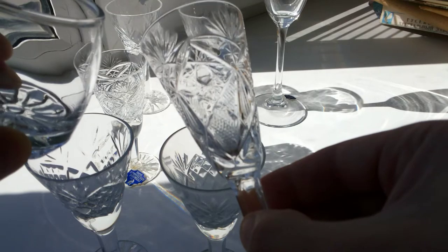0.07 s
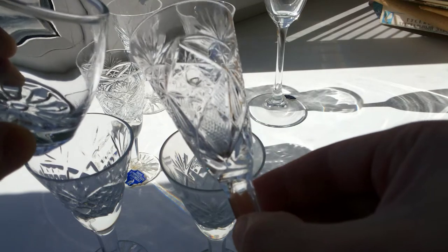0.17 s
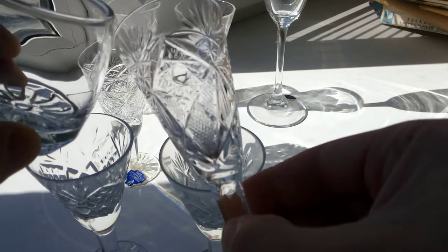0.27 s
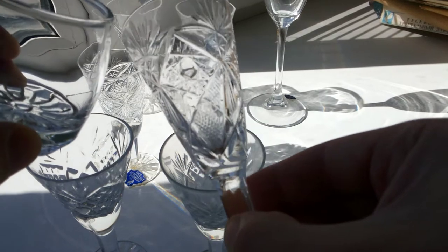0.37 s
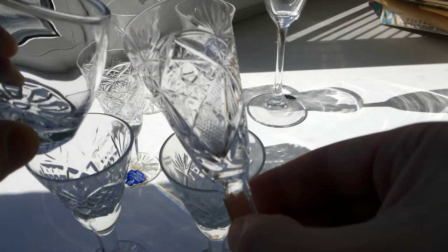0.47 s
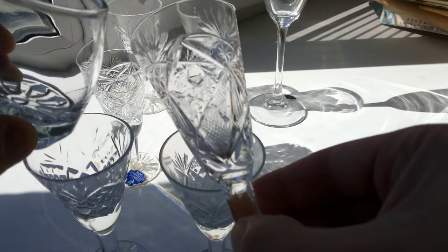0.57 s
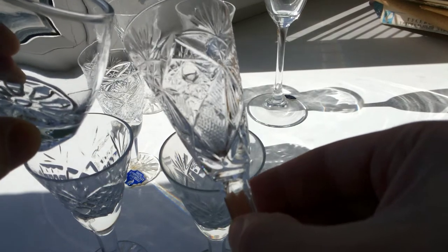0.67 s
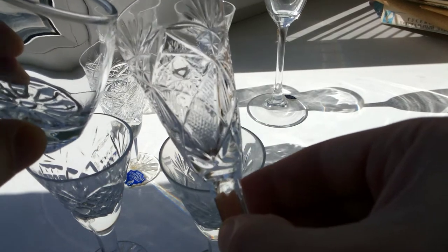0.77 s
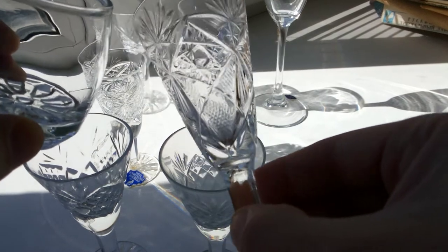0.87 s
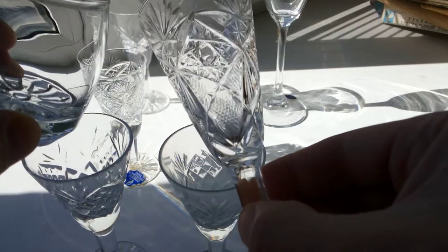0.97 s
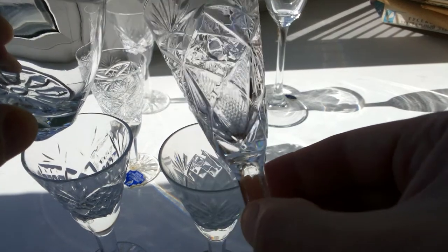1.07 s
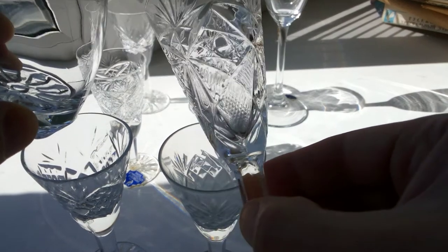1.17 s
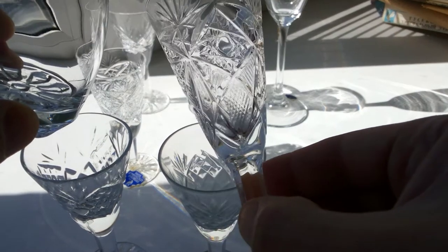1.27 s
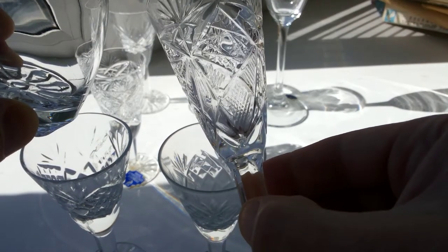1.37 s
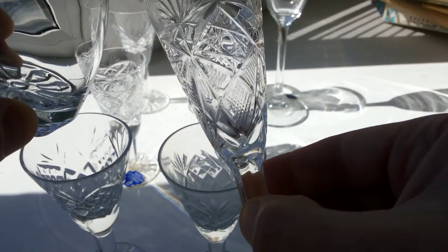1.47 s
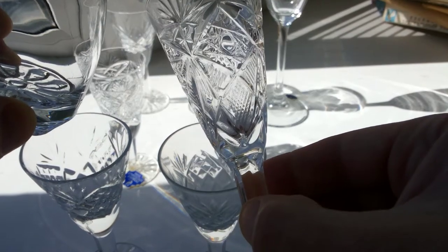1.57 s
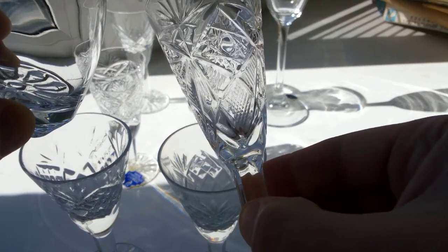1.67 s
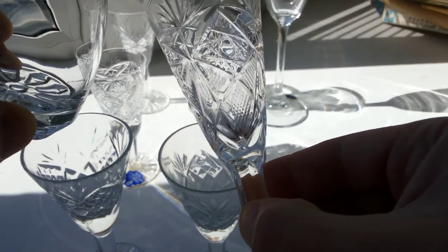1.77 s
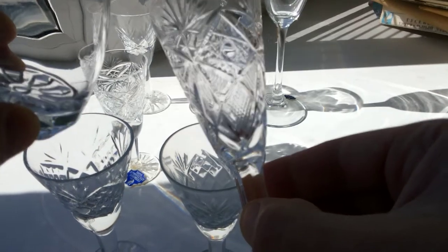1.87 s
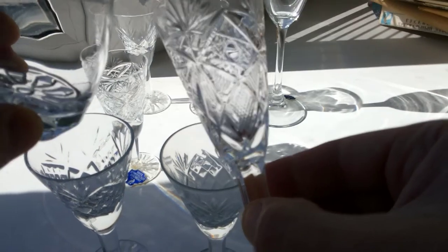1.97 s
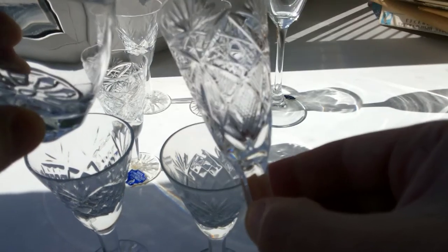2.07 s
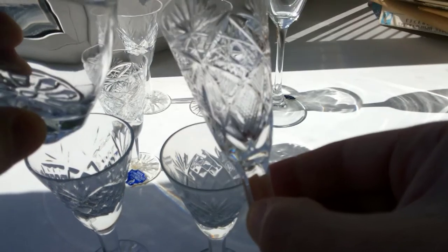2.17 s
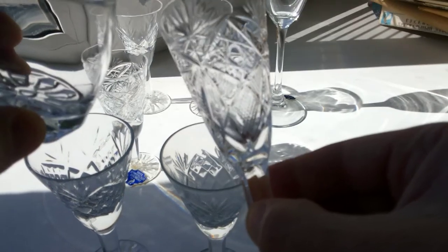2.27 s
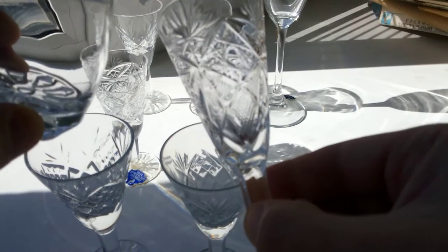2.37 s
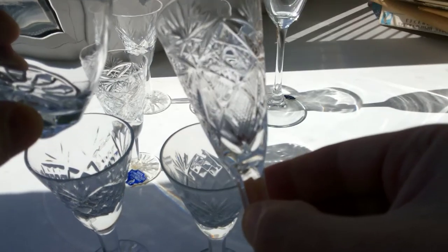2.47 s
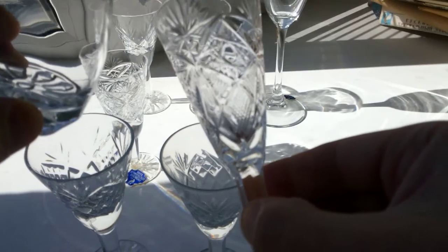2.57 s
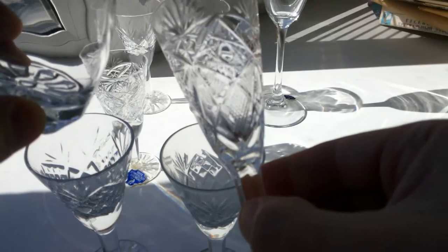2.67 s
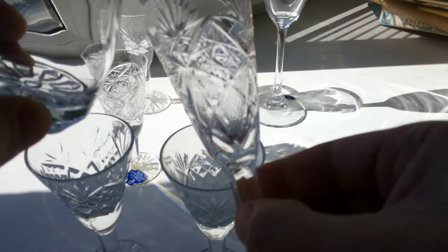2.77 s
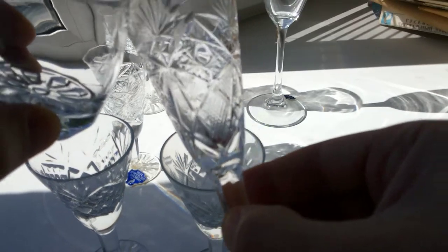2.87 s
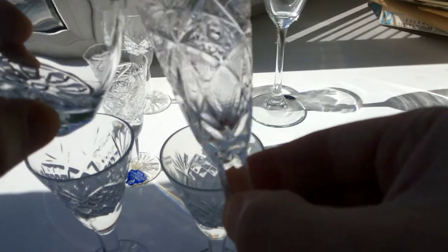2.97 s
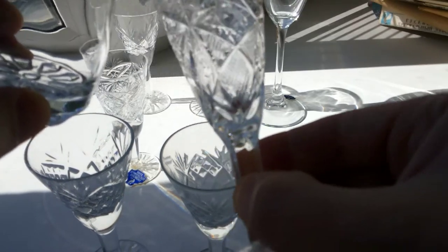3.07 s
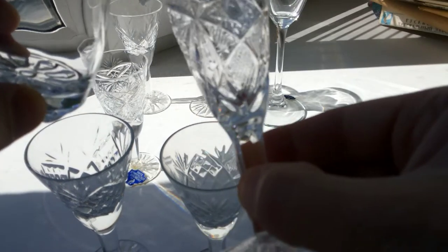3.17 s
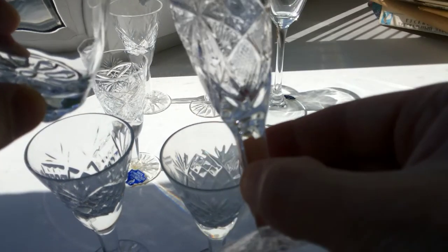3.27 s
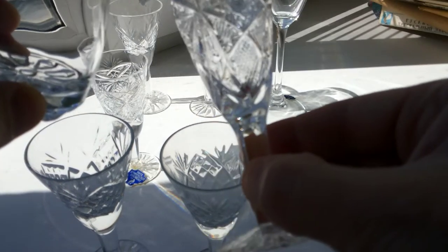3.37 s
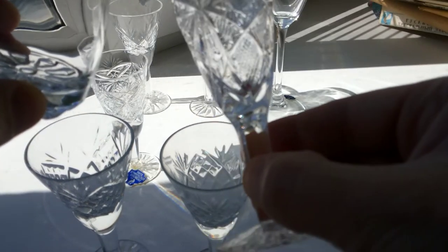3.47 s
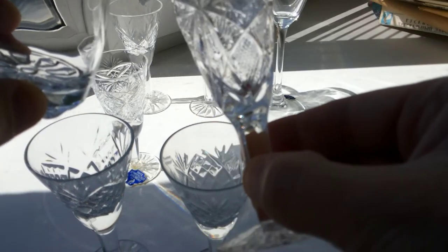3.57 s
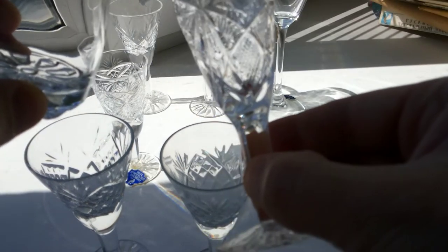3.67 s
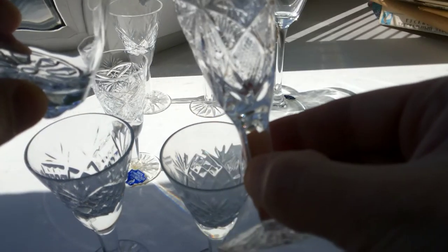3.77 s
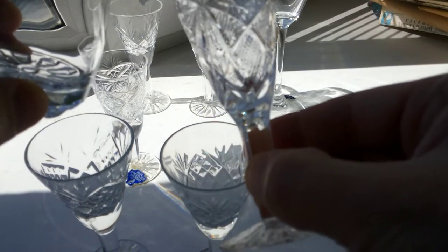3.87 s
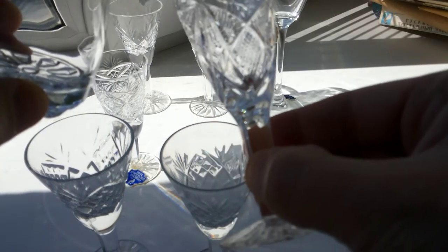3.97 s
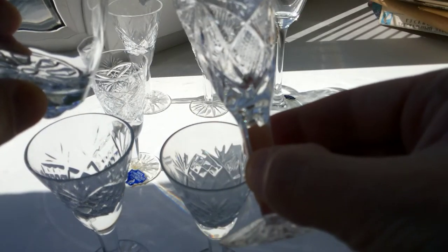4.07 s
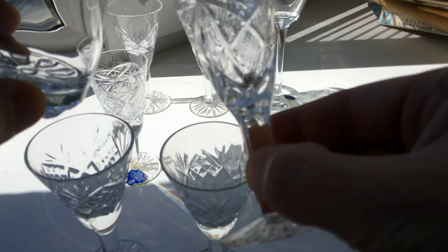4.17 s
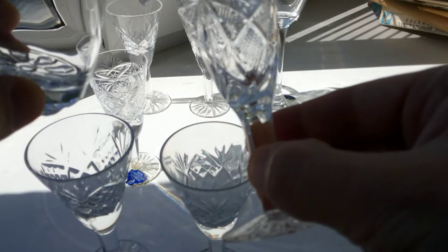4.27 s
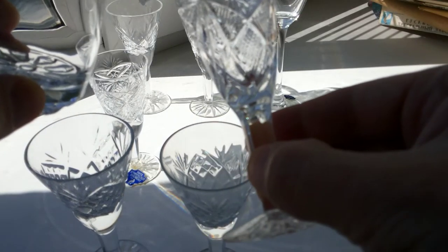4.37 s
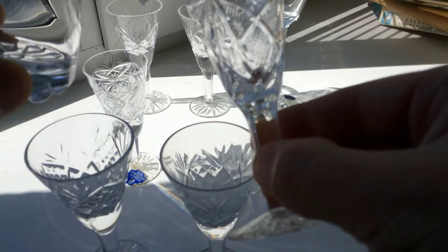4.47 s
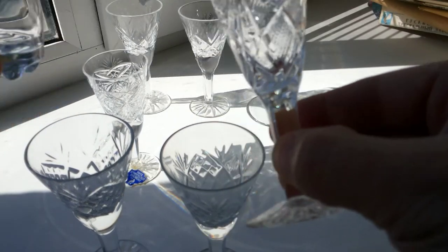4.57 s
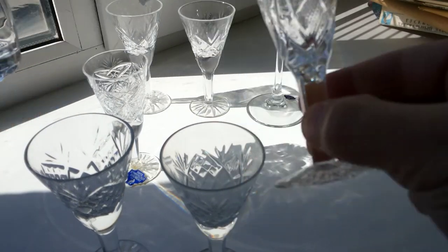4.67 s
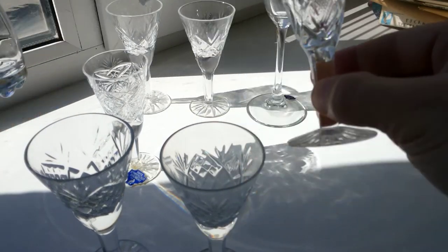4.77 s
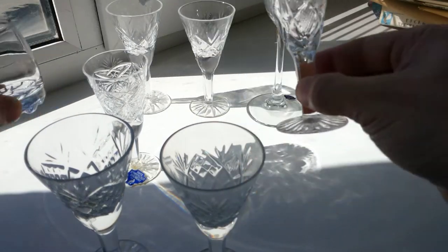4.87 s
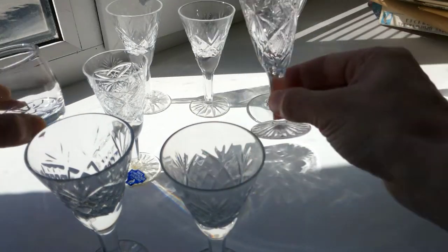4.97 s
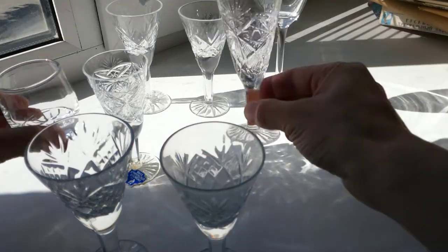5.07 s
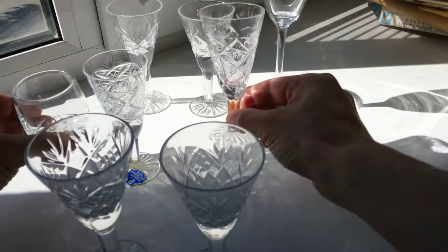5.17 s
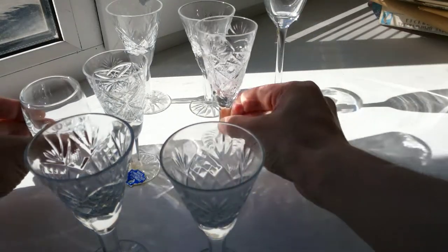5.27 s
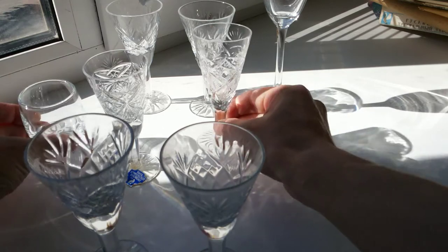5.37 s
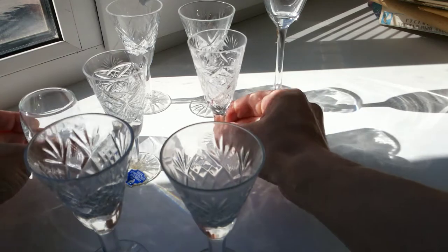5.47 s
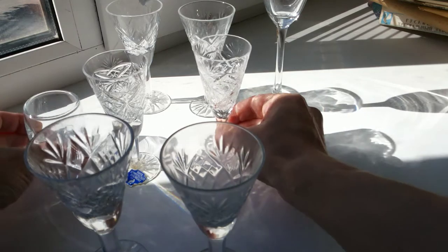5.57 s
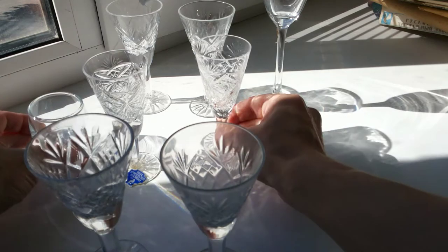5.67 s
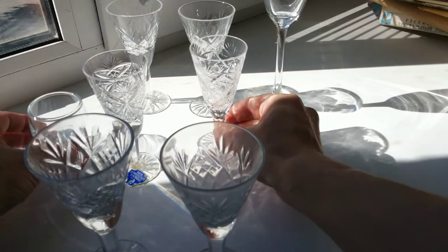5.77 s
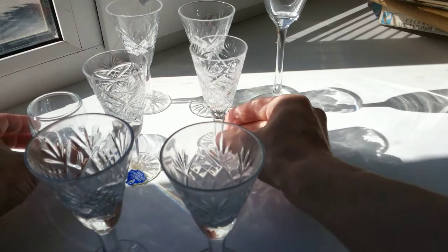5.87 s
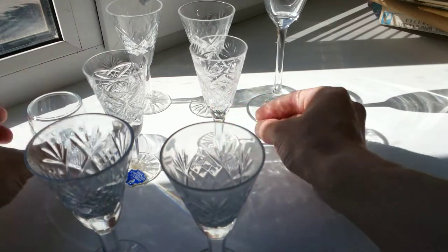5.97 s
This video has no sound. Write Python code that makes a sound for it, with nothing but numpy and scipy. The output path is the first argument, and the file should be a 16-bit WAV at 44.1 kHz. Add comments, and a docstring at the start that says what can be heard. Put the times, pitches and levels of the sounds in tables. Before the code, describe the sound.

A small quiet room heard close up: soft, low-weighted room air, a faint wavering drone and an almost inaudible high whine. At about 0.84 seconds two cut-crystal rims meet and bounce three times within 0.06 seconds, the last touch weaker: a hard, short clack, a bright glittering flare, then thin high tones, the main one near 3 kHz, slowly beating and fading over about a second. Quiet returns. At 2.99 a stronger, brighter clink arrives as two touches 0.03 seconds apart, with a similar shimmering, beating ring dying by about 4.4. Around 5.2 to 5.5 reaching arms make a soft rustle and low rumble. At 5.73 light knocks begin, the heaviest cluster at 5.78, then smaller rocking knocks at about 5.9 and 6.0: dull, low-mid, woody thuds with faint glassy ticks and a little hiss, in short room reflections.

```python
"""Two crystal glasses clink together twice, close by, in a small quiet room, then are set down on a table.
In each clink the rims bounce on each other: a hard clack, a bright flare, then beating, fading tones.
The tones are sine waves, many in close pairs; the clack is a few short resonances, the flare shaped noise.
The table answers the feet of the glasses with dull knocks: struck resonances over a thud of noise.
Reaching arms rustle and rumble softly before it; room air, a low drone and a faint whine lie beneath."""
import sys
import numpy as np
from scipy import signal
from scipy.fft import rfft, irfft, next_fast_len
from scipy.io import wavfile

SR = 44100
rng = np.random.default_rng(int(sys.argv[2]) if len(sys.argv) > 2 else 0)


def wav_out(sig):
    """Save sig, one row per channel (or a flat mono array), as 16-bit PCM at SR to the path in sys.argv[1]."""
    wavfile.write(sys.argv[1], SR, np.round(np.clip(np.atleast_2d(sig).T, -1, 1) * 32767).astype(np.int16))


N = 265967
TIME = np.arange(N) / SR  # seconds

# touches of the two rims, one list per clink:
# (t/s, new ringing level/dB, earlier ringing that survives level/dB, clack level/dB, shimmer level/dB)
CLINKS = [
    [(0.8403, -2.5, 0, -1, -1.5), (0.8714, -3.5, -21, -2.5, -5), (0.9021, -7.5, -4.5, -12.5, -14)],
    [(2.9928, 0, -3, 2, 2), (3.0270, -0.5, -9, -2, 2.5)],
]


def from_db(db):
    """Turn decibels into gain."""
    return 10 ** (np.asarray(db) / 20)


def noise(spectrum):
    """Make noise of rms 1 whose colour follows points of frequency and relative level."""
    hz, db = np.transpose(spectrum)
    size = next_fast_len(N)
    grid = np.maximum(np.fft.rfftfreq(size, 1 / SR), 1)
    gain = from_db(np.interp(np.log(grid), np.log(hz), db))
    white = rng.standard_normal(size)
    x = irfft(rfft(white) * gain, size)[:N]
    return x / np.std(x)


def decay(start, t60):
    """An envelope that jumps to 1 and dies away, losing 60 dB in t60 seconds."""
    age = TIME - start
    return (age >= 0) * np.exp(-np.log(1000) * np.clip(age / t60, 0, 10))


def swell(peak_s, rise_db_per_s, fall_db_per_s):
    """An envelope that grows to 1 and fades again."""
    age = TIME - peak_s
    return from_db(np.minimum(rise_db_per_s * age, -fall_db_per_s * age))


def click(start, db):
    """A single impulse, like one very short tap."""
    return from_db(db) * (np.arange(N) == round(start * SR))


def ring(force, hz, t60):
    """A resonance: each unit impulse in the force starts a fading sine of about height 1."""
    r = np.exp(-np.log(1000) / (t60 * SR))
    w = 2 * np.pi * hz / SR
    # the tiny offset here and in the filters below keeps the numbers from getting too small to compute fast
    return signal.lfilter([0, np.sin(w)], [1, -2 * r * np.cos(w), r * r], force + 1e-18)


def low_pass(x, hz, order=2):
    """Round off the treble."""
    sections = signal.butter(order, min(hz, .45 * SR), fs=SR, output="sos")
    return signal.sosfilt(sections, x + 1e-18)


def high_pass(x, hz, order=2):
    """Take away the bass."""
    sections = signal.butter(order, hz, "high", fs=SR, output="sos")
    return signal.sosfilt(sections, x + 1e-18)


def drone(hz=167, t60=0.084):
    """Noise of rms 1 held in a narrow low resonance, which makes it waver."""
    x = ring(ring(rng.standard_normal(N), hz, t60), hz, t60)
    return x / np.std(x)


def background(air_db=-56.5, drone_db=-65.5, whine_t60=0.05):
    """Steady room air is coloured noise; the low drone and faint whine are noise in narrow resonances."""
    # colour of the room air: (f/Hz, relative level/dB)
    air_colour = [(15, -55), (25, -23), (91, -4.5), (137, -7.5), (165, 0.5), (205, -9.5), (361, -15),
                  (403, -14.5), (637, -18.5), (2150, -26), (3390, -25), (4450, -27.5), (6490, -24.5),
                  (7030, -29), (15800, -28)]
    # faint steady whine: (f/Hz, level/dB)
    whine_tones = [(6940, -90), (5650, -97)]
    out = from_db(air_db) * noise(air_colour) + from_db(drone_db) * drone()
    for hz, db in whine_tones:
        whine = ring(rng.standard_normal(N), hz, whine_t60)
        out += from_db(db) * whine / np.std(whine)
    return out


def arms(rustle_db=-61, rumble_db=-54):
    """One reach toward the table: a soft rustle and a low rumble swell and fade together."""
    # colour of the rustle: (f/Hz, relative level/dB)
    rustle_colour = [(100, -20), (300, 3), (1100, -2.5), (2000, -13), (8000, -21)]
    effort = swell(peak_s=5.37, rise_db_per_s=110, fall_db_per_s=36)
    rustle = from_db(rustle_db) * noise(rustle_colour)
    rumble = from_db(rumble_db) * drone()
    return effort * (rustle + rumble)


def room(x, early_db, late_db, early_t60=0.13, late_t60=0.68, gap=0.0054):
    """Quick reflections from the table and window, then a faint tail, both made of fading noise."""
    # colour of the reflections: (f/Hz, relative level/dB)
    room_colour = [(80, 12), (500, 6), (1500, -1.5), (5000, 6.5), (15000, -3)]
    out = x
    for db, t60 in (early_db, early_t60), (late_db, late_t60):
        echo = (noise(room_colour) * decay(gap, t60))[:SR]
        echo = echo / np.linalg.norm(echo)
        out = out + from_db(db) * signal.fftconvolve(x, echo)[:N]
    return out


def table(body_db=-16, body_t60=0.023, tail_db=-32, tail_t60=0.3, hardness=1.66, swell_hz=700, scatter_db=2.0):
    """The feet land and rock: each contact strikes the table's resonances, with a faint tick of glass."""
    # feet meeting the table: (t/s, knock level/dB, contact brightness f/Hz, glassy tick level/dB, tick t60/s)
    set_downs = [(5.7279, -6, 1290, -37.5, 0.012), (5.7397, -7.5, 600, -66, .028),
                 (5.7519, -9, 1800, -64, .028), (5.7811, 2.5, 1200, -47.5, 0.037),
                 (5.7852, 1, 1290, -41, 0.044), (5.7905, -1.5, 1510, -37.5, 0.043),
                 (5.8089, -12, 1100, -65, .028), (5.8960, -10.5, 900, -56, .028),
                 (5.9100, -3.5, 660, -70, .028), (5.9170, -4, 620, -57, .028),
                 (5.9971, -15, 249, -72, .028)]
    # main resonances of the table top: (f/Hz, t60/s, level/dB before random scatter)
    table_modes = [(98, 0.203, -31.5), (173, 0.23, -29), (302.4, 0.12, -22), (410, 0.05, -25),
                   (436, 0.1, -26), (494, 0.072, -23), (564, 0.054, -16), (687, 0.012, -18),
                   (790, 0.046, -23.5), (840, 0.047, -18), (988, 0.042, -31), (1126, 0.093, -25.5),
                   (1366, 0.15, -36)]
    # dense body of the table under its main resonances: (f/Hz, relative level/dB)
    table_body = [(40, -29), (100, -19), (200, 0), (330, 0), (560, 4), (850, -2.5), (1400, -7.5),
                  (1900, -18), (2600, -35), (5000, -27)]
    # colour of the glassy ticks: (f/Hz, relative level/dB)
    tick_colour = [(2000, 1), (5000, -2.5), (8000, -9), (11500, 2.5), (15500, -2)]
    # colour of the hiss after the set-down: (f/Hz, relative level/dB)
    hiss_colour = [(1000, 3), (3000, -4), (6000, -4), (8000, -8), (15500, -9)]
    foot_hz, foot_t60, foot_db = 6020, .07, -19  # short ping of a glass foot; its level is relative to the tick

    out, ticks = np.zeros((2, N))
    body = noise(table_body)
    for s, knock_db, bright_hz, tick_db, tick_t60 in set_downs:
        at = round(s * SR)
        force = low_pass(click(s, knock_db)[at:], bright_hz)
        for k, (hz, t60, db) in enumerate(table_modes):
            gain = from_db(db + scatter_db * rng.normal())  # every knock has its own mix
            out[at:] += (-1) ** k * gain * ring(force, hz, t60)

        # the heavy top takes a moment to move, and a soft landing stirs only its low part
        shake = from_db(knock_db + body_db) * decay(s, body_t60)
        shake += from_db(knock_db + tail_db) * decay(s, tail_t60)
        shifted_body = np.roll(body, rng.integers(N))
        thud = low_pass(shake[at:], swell_hz) * shifted_body[at:]
        out[at:] += low_pass(thud, hardness * bright_hz)

        out[at:] += ring(click(s, tick_db + foot_db)[at:], foot_hz, foot_t60)
        ticks += from_db(tick_db) * decay(s, tick_t60)

    # a faint bright hiss starts at the set-down and slowly fades
    hiss = from_db(-58) * decay(start=5.795, t60=3.0)
    return out + ticks * noise(tick_colour) + hiss * noise(hiss_colour)


def contacts(shimmer_db=-22, shimmer_t60=0.054, flare_db=-16, flare_t60=0.014, flare_delay=0.002):
    """Each touch is a hard clack, then a bright flare as the shock spreads into the dense upper modes."""
    # brief, heavily damped resonances of a rim contact: (f/Hz, t60/s, level/dB)
    clack_modes = [(1112, 0.0055, -11), (1515, 0.0043, -13.5), (3290, 0.0023, -51), (3960, 0.028, -30.5),
                   (5800, 0.012, -39)]
    # dense upper modes of the cut glass: (f/Hz, relative level/dB)
    shimmer_colour = [(700, -20), (2400, -12), (3700, -6.5), (4800, -22), (5400, -11), (6000, -6),
                      (6600, -22.5), (7900, -22), (9200, -11.5), (10500, -19), (11900, -6), (12700, -11),
                      (14000, 2), (15300, -7), (15900, -3.5)]
    force, glitter = np.zeros(N), np.zeros(N)
    for s, _, _, clack_db, bright_db in CLINKS[0] + CLINKS[1]:
        force += click(s, clack_db)
        glitter += from_db(bright_db + shimmer_db) * decay(s, shimmer_t60)
        glitter += from_db(bright_db + flare_db) * decay(s + flare_delay, flare_t60)

    clack = np.zeros(N)
    for k, (hz, t60, db) in enumerate(clack_modes):
        clack += (-1) ** k * from_db(db) * ring(force, hz, t60)
    return clack, glitter * noise(shimmer_colour)


def bowls(scatter_db=0.5, attack_hz=400):
    """Touches check earlier ringing and feed new energy into the bowl modes; close pairs beat as they fade."""
    # modes of the two bowls: (f/Hz, t60/s, level in the first clink/dB, level in the second clink/dB)
    bowl_modes = [ (2466, .14, -48, -37.5), (2492, .14, -34, -47), (3003.3, 1.38, -40, -29.5),
                  (3008.05, 1.38, -26, -31.3), (3942, .31, -31, -27.5), (3953, .12, -37, -23.5),
                  (4014, .05, -35, -26), (5300, .55, -36, -26.5), (5322.5, .52, -26.5, -36.5),
                  (5995, .08, -35, -33), (8302, .18, -42, -38), (8678, .28, -45, -36),
                  (8716, .16, -34.5, -44), (9780, .09, -46, -40), (11836, .1, -36, -38),
                  (13105, .21, -46, -33), (13500, .06, -35, -30), (13594, .1, -27, -39),
                  (14445, .07, -35, -31), (14648, .09, -35, -26), (14722, .095, -16.5, -35),
                  (14733, .115, -39, -18.5), (15150, .06, -31, -24), (15250, .06, -31, -27)]
    # where the rims meet sets how far out of step neighbouring modes start: one angle/rad per clink
    pair_lag = [-.1, 3.85]
    out = np.zeros(N)
    age = TIME[:2 * SR]  # each clink is followed for two seconds
    for which, touches in enumerate(CLINKS):
        first = round(touches[0][0] * SR)
        for k, (hz, t60, *levels_db) in enumerate(bowl_modes):
            energy = np.zeros(len(age))
            fade = np.exp(-2 * np.log(1000) * np.minimum(age / t60, 10))
            for s, ring_db, kept_db, _, _ in touches:
                at = round(s * SR) - first
                fresh = from_db(ring_db + scatter_db * rng.normal()) ** 2 * fade[:len(age) - at]
                kept = energy[at:] * from_db(min(kept_db, 0)) ** 2
                energy[at:] = kept + fresh
            tone = np.sin(2 * np.pi * hz * age + k * pair_lag[which])
            height = low_pass(np.sqrt(energy), attack_hz, order=1)  # softens the start
            out[first:first + len(age)] += from_db(levels_db[which]) * height * tone
    return out


def scene():
    """Glasses, table and arms in the room; small bowls radiate no bass, the table top little."""
    clack, shimmer = contacts()
    rings = room(bowls(), early_db=-24, late_db=-42)
    hits = room(clack, early_db=-16.5, late_db=-20)
    hits = hits + room(shimmer, early_db=-15, late_db=-18.5)
    knocks = room(table(), early_db=-12, late_db=-21)
    glasses = high_pass(rings + hits, hz=422)
    return (glasses + high_pass(knocks, hz=147) + background() + arms())[None]


def record(dry, open_db=-58, range_db=7, lift_db=3.0, release_hz=3.0, rumble_hz=125):
    """While something sounds, a mild noise suppressor lets more hiss through and cuts rumble; the top is cut."""
    power = low_pass(high_pass(dry, 1100) ** 2, release_hz, order=1)
    level_db = 10 * np.log10(np.abs(power) + 1e-12)
    is_open = np.clip((level_db - open_db) / range_db, 0, 1)  # slides from 0, closed, to 1, open
    opened = high_pass(dry, rumble_hz, order=1)
    closed = from_db(-lift_db) * dry
    gated = is_open * opened + (1 - is_open) * closed
    top_cut = signal.ellip(10, .2, 80, 15750, fs=SR, output="sos")  # steep cut above 15750 Hz
    return signal.sosfilt(top_cut, gated)


dry = scene()
out = record(dry)
wav_out(out)
```